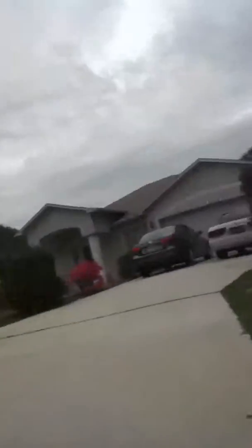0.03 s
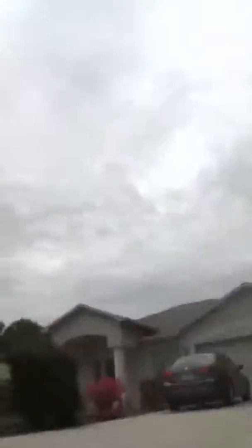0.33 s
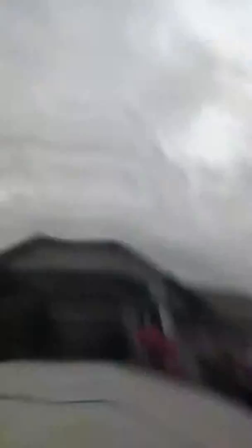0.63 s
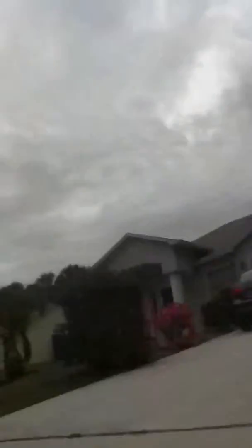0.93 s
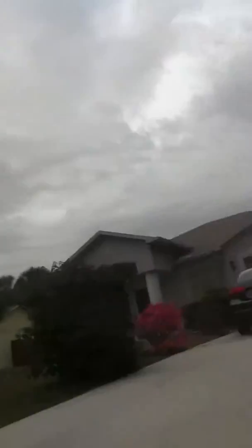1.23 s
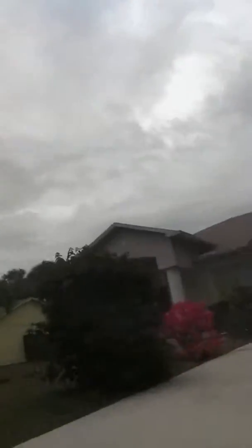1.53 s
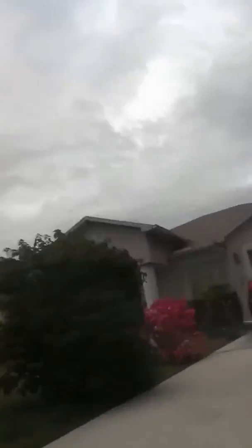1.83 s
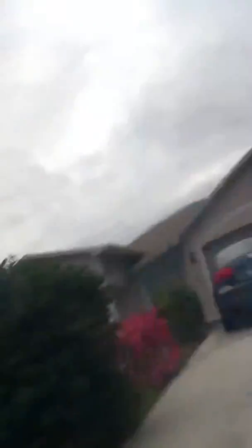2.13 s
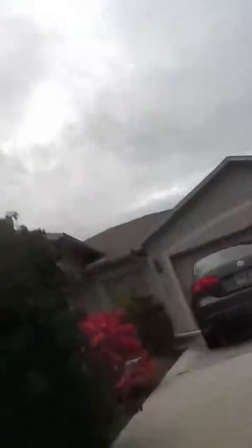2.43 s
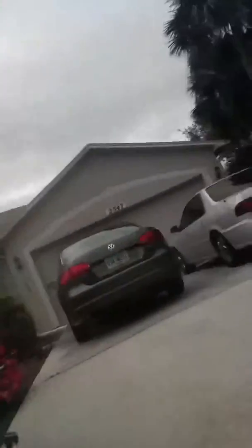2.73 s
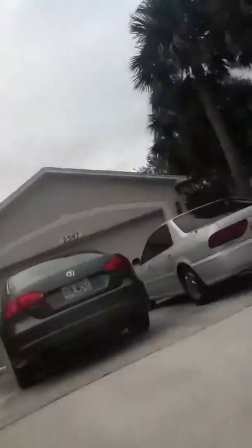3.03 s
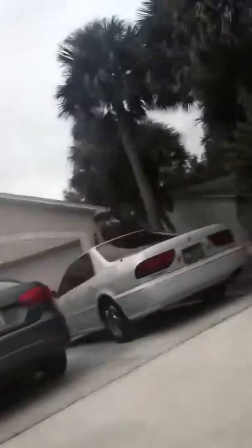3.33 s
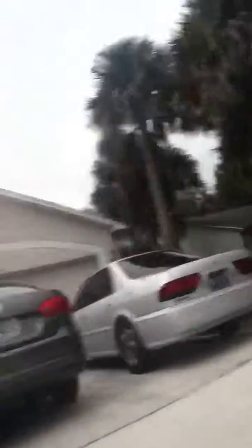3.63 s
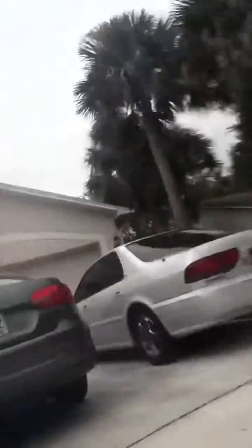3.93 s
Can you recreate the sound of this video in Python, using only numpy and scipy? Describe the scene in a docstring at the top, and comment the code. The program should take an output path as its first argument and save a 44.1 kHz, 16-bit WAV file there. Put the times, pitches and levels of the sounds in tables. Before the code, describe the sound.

A scooter rolls over concrete with a low rumble and gritty crunch, while wind buffets the close microphone. At about 0.5 seconds plastic scuffs and squeaks briefly, then quick ticks, clacks and small bumps follow. A strong thud comes at 2.2 seconds and a sharp plastic snap at 2.4. The rolling continues with sparser, lighter ticks and another bump near 3.7 seconds.

```python
"""A low rumble and a crunch of grit are heard first: a scooter rolls up a concrete driveway.
The microphone rides along in a plastic case, shaken by road vibration and buffeted by wind.
Impacts excite the damped modes of the case and its loose parts as ticks, clacks and snaps;
friction adds scuffs and squeaks, and bumps thud through the frame. A limiter holds the peaks down."""
import sys
import numpy as np
from scipy import signal
from scipy.fft import rfft, irfft
from scipy.io import wavfile
from scipy.ndimage import uniform_filter1d, minimum_filter1d

SR = 44100
rng = np.random.default_rng(int(sys.argv[2]) if len(sys.argv) > 2 else 0)


def pcm_store(signal):
    """Save signal as 16-bit PCM."""
    levels = np.round(np.clip(np.atleast_2d(signal), -1, 1) * 32767)
    wavfile.write(sys.argv[1], SR, levels.astype(np.int16).T)


N = 176400

# Levels are relative within each table; layer gains set the balance.
# Strength of the wind buffeting: time_s, level_db
WIND_LEVEL = [(.5, -43.5), (1, -26), (1.8, -34), (2.7, -23), (3.9, -28.5)]
# Spectrum of the buffeting: frequency_hz, level_db
WIND_SPECTRUM = [(30, -45), (60, 25), (85, 19), (160, -59.5)]
# Strength of the road vibration: time_s, level_db
ROAD_LEVEL = [(0, -11), (.34, -14.5), (.45, -19), (.72, -24.5), (.8, -21), (1.17, -21.5), (1.22, -16),
              (1.55, -17), (1.78, -11), (2.1, -18), (2.14, -23.5), (2.27, -27), (2.32, -18), (2.66, -16),
              (2.71, -26.5), (2.78, -17), (3.62, -16), (3.67, -10), (3.73, -17.5), (3.85, -17),
              (3.87, -29.5)]
# Spectrum of the road vibration: frequency_hz, level_db
ROAD_SPECTRUM = [(30, -37), (60, -24.5), (90, 0.5), (135, 2), (230, -1.5), (330, -6), (480, -15.5),
                 (800, -25), (1600, -60)]
# Strength of the rolling noise: time_s, crunch_db, hiss_db
ROLLING_LEVEL = [(0, -26.5, -40.5), (.33, -30.5, -41.5), (.38, -32.5, -49), (.55, -28, -41),
                 (.69, -40.5, -53.5), (1.12, -32.5, -51), (1.6, -32.5, -68), (1.68, -25, -42.5),
                 (1.86, -32, -44), (1.93, -36, -55.5), (2.2, -37, -51), (2.72, -38, -55.5),
                 (2.8, -37, -52.5), (3.66, -33.5, -52.5), (3.84, -42.5, -59.5), (3.88, -51.5, -65)]
# How unevenly the wheels run: time_s, roughness (0 to 1)
GROUND_ROUGHNESS = [(.58, .55), (.7, 1), (2.65, 1), (2.85, .75)]
# Body of rolling and rubbing noise: frequency_hz, level_db
CRUNCH_SPECTRUM = [(250, 0), (500, -1), (800, 1), (1300, -4), (1900, -6.5), (2950, -11.5), (3550, -23)]
# Treble of rolling and rubbing noise: frequency_hz, level_db
HISS_SPECTRUM = [(2000, -9.5), (3000, -0.5), (4400, 6.5), (5500, 2), (7800, 5.5), (9300, -3), (11000, -4.5),
                 (12500, -14.5), (16000, -18)]
# Resonances of the wheels: frequency_hz, width_hz
WHEEL_RESONANCES = [(1320, 165), (1800, 330)]
# Rubs against the case: start_s, length_s, body_db, treble_db
SCUFF_STROKES = [(0.49, 0.099, -24.5, -58), (0.53, 0.013, 3, -7.5), (0.976, 0.012, -21.5, -39),
                 (1.116, 0.025, -24, -45), (1.821, 0.083, -25.5, -40), (2.038, 0.029, -14.5, -20),
                 (2.216, 0.027, -5, -20), (2.773, 0.053, -26, -38.5)]
# Squeaks of rubbed plastic: start_s, length_s, pitch_hz, level_db
SQUEAK_STROKES = [(0.485, 0.05, 1150, -24), (0.58, 0.05, 2250, -31)]
# Bumps through the frame: start_s, peak_db
BUMP_HITS = [(0.759, -9), (1.041, -12), (1.128, -4.5), (1.207, -5.5), (1.243, -6.5), (1.958, -10),
             (2.219, 9), (2.777, -3.5), (3.339, -13), (3.662, -3.5)]
# Sharp ticks of the case: start_s, peak_db
TICK_HITS = [(0.3051, -9), (0.5032, -8.5), (0.6722, -17), (0.7067, -15), (0.7565, -1.5), (0.7597, -17),
             (0.823, -9.5), (0.8459, -14.5), (0.854, -10), (0.897, -16), (0.9196, -11.5), (0.942, -11.5),
             (0.981, -10), (1.0381, -9), (1.0607, -16), (1.0931, -9), (1.1169, -15), (1.1787, -19.5),
             (1.202, -12), (1.2487, -13.5), (1.3086, -13.5), (1.3252, -12.5), (1.3407, -13), (1.354, -21),
             (1.365, -14), (1.3889, -9.5), (1.4033, -15.5), (1.4276, -11.5), (1.4398, -17), (1.4712, -9),
             (1.4872, -18), (1.4953, -6), (1.5126, -11.5), (1.5549, -16), (1.576, -9), (1.6174, -4.5),
             (1.6588, -4), (1.6879, -13), (1.737, -16), (1.816, -13), (1.9114, -12), (1.9545, -2),
             (1.9607, -10), (2.0053, -15), (2.04, -9.5), (2.1641, -13.5), (2.4663, -12.5), (3.4726, -8),
             (3.572, -4.5), (3.6042, -10.5), (3.6736, -3), (3.8632, -4.5)]
# Duller clacks of loose parts: start_s, peak_db
CLACK_HITS = [(0.059, -7), (0.161, -8), (0.549, -5.5), (0.663, -10.5), (0.672, -11.5), (0.756, 0.5),
              (0.762, -6.5), (0.816, -17), (0.844, -15.5), (0.943, -5), (0.949, -15), (0.976, -9.5),
              (1.04, -10), (1.094, -12.5), (1.128, -22.5), (1.63, -9.5), (1.665, -12), (1.852, -10.5),
              (2.068, -11.5), (2.112, -15), (2.218, -1.5), (2.382, -12), (2.554, -16.5), (2.643, -9),
              (2.657, -11.5), (3.678, -11), (3.761, -15)]
# Hard plastic snaps: start_s, peak_db
SNAP_HITS = [(2.4125, 11), (2.422, -7.5), (2.586, -5.5), (3.8641, -6)]
# Low modes of the frame: frequency_hz, level_db, t60_s
FRAME_RESONANCES = [(131.5, 2.4, 0.063), (207.8, 4.9, 0.052), (335, 3.4, 0.023)]
# Modes of the ticking case: frequency_hz, level_db, t60_s
TICK_RESONANCES = [(2320, 4, 0.0018), (3700, -2, 0.0031), (4460, -2, 0.0026), (7150, 2, 0.0019),
                   (8100, 0, 0.0037), (10500, -2, 0.0016), (14400, -19, 0.0032)]
# Modes of the loose parts: frequency_hz, level_db, t60_s
CLACK_RESONANCES = [(338, -3, 0.0081), (640, -5, 0.0063), (1075, -4.5, 0.0032), (1426, -6, 0.0034),
                    (1790, -6, 0.0033), (2230, -11, 0.0028), (3840, -10.5, 0.00064)]
# Modes of the snapping plastic: frequency_hz, level_db, t60_s
SNAP_RESONANCES = [(2220, 6.4, 0.0049), (4060, 7.4, 0.00084)]

ROAD_GAIN_DB, CRUNCH_GAIN_DB, HISS_GAIN_DB, WHEEL_RING_GAIN_DB = -1, 1.5, 4.5, -13
TICK_GAIN_DB, NUDGE_GAIN_DB, CLACK_GAIN_DB, SNAP_GAIN_DB, BUMP_GAIN_DB = 0.5, -0.5, 6, -4, 5
GRIT_PER_S, GRIT_SPREAD_DB = 190, 6
FLUTTER_DB, SHAKE_EXPONENT, GRIT_SHARE = 4, .8, .82  # at full roughness
SQUEAK_RISE, SQUEAK_WOBBLE = .14, .07  # shares of the pitch
CONTACT_LAG_S, BUMP_LAG_S, CHATTER_S = 0.001, 0.00439, 0.0018
REBOUND_S, REBOUND_LOSS_DB, ROUGH_ENDS_S = .007, 10, 2.7
LIGHT_TICK_BAND_HZ = (4800, 9300)
LIMIT, RELEASE_DB_PER_S, LOW_CUT_HZ, HIGH_CUT_HZ = 0.74, 905, 38, 16000


def from_db(db):
    """Amplitude grows tenfold for every 20 dB."""
    return 10 ** (np.asarray(db) / 20)


def unit_rms(x):
    """Normalisation to a mean power of one."""
    return x / np.sqrt(np.mean(x ** 2) + 1e-20)


def envelope(x, size):
    """Short-time rms over a window of size samples."""
    return np.sqrt(uniform_filter1d(x ** 2, size=size) + 1e-9)


def evened(x, size):
    """Division by the envelope removes slow swells and keeps the fine grain."""
    return unit_rms(x / envelope(x, size))


def in_time(rows):
    """Linear interpolation gives each column of a curve at every sample."""
    time_s, *columns = np.transpose(rows)
    return [np.interp(np.arange(N) / SR, time_s, column) for column in columns]


def drift(corner_hz):
    """Low-pass filtered noise wanders smoothly with a spread near one."""
    step = 40  # samples between control points
    pole = np.exp(-2 * np.pi * corner_hz * step / SR)
    noise = rng.standard_normal(N // step + 2002)
    slow = signal.lfilter([1], [1, -2 * pole, pole * pole], noise)[2000:]
    return np.interp(np.arange(N) / step, np.arange(len(slow)), unit_rms(slow))


def coloured(x, spectrum, edge_db_per_octave=24):
    """A minimum-phase filter imposes the spectrum and rolls off above its last point; rms 1."""
    hz, db = np.transpose(spectrum)
    grid_hz = np.maximum(np.arange(N // 2 + 1) * SR / N, 1)
    shape_db = np.interp(np.log(grid_hz), np.log(hz), db)
    shape_db -= edge_db_per_octave * np.maximum(np.log2(grid_hz / hz[-1]), 0)
    cepstrum = irfft(np.log(from_db(shape_db)), N)
    cepstrum[1:N // 2] *= 2  # folding makes the filter causal
    cepstrum[N // 2 + 1:] = 0
    return unit_rms(irfft(rfft(x) * np.exp(rfft(cepstrum)), N))


def resonant(x, hz, width_hz):
    """A driven resonator responds most near its natural frequency; rms 1."""
    radius = np.exp(-np.pi * width_hz / SR)
    feedback = [1, -2 * radius * np.cos(2 * np.pi * hz / SR), radius * radius]
    return unit_rms(signal.lfilter([1, 0, -1], feedback, x))


def impacts(hits, modes, vary_db, detune, chatter, lag_s=CONTACT_LAG_S, size=4096):
    """Modal superposition: a chattering impulse drives damped sinusoids that vary from hit to hit."""
    out, t = np.zeros(N + 2 * size), np.arange(size) / SR
    hz, db, t60_s = np.transpose(modes)[:, :, None]
    signs = (-1) ** np.arange(len(modes))[:, None]
    for start_s, peak_db in hits:
        strength, shift = rng.standard_normal((2, len(modes), 1))
        decay = from_db(db + vary_db * strength - 60 * t / t60_s)
        ring = np.sum(signs * decay * np.sin(2 * np.pi * hz * (1 + detune * shift) * t), axis=0)
        force = chatter * rng.standard_normal(size) * np.exp(-t / CHATTER_S)
        force[0] += 1
        hit = signal.fftconvolve(ring, force)[:size]
        start = int(np.clip((start_s + lag_s) * SR, 0, N))
        out[start:start + size] += rng.choice([-1, 1]) * from_db(peak_db) * hit / np.abs(hit).max()
    return out[:N]


def wind():
    """Turbulent pressure on the microphone is heard as deep buffeting."""
    level_db, = in_time(WIND_LEVEL)
    pressure = coloured(rng.standard_normal(N), WIND_SPECTRUM)
    return from_db(level_db) * evened(pressure, size=4400)


def road_rumble(shake):
    """Structure-borne vibration from the road is heard as a low rumble."""
    level_db, = in_time(ROAD_LEVEL)
    return from_db(ROAD_GAIN_DB + level_db) * shake


def wheels(shake):
    """Rolling contact: rush and random grit impulses surge with the load and ring the wheels."""
    crunch_db, hiss_db = in_time(ROLLING_LEVEL)
    roughness, = in_time(GROUND_ROUGHNESS)
    grains = from_db(GRIT_SPREAD_DB * np.minimum(rng.exponential(1, N), 2)) * rng.choice([-1, 1], N)
    grit = grains * (rng.random(N) < GRIT_PER_S / SR)
    jolts = envelope(shake, size=260) ** (SHAKE_EXPONENT * roughness)
    load = jolts * from_db(FLUTTER_DB * roughness * drift(70))
    grit_share = GRIT_SHARE * roughness

    def rolling(spectrum):
        """Uncorrelated rush and grit add in power and pass through one filter."""
        rush = np.sqrt(1 - grit_share) * rng.standard_normal(N)
        crackle = np.sqrt(grit_share) * unit_rms(grit * rng.random(N))
        return evened(coloured(load * (rush + crackle), spectrum), size=3000)

    crunch = rolling(CRUNCH_SPECTRUM)
    ring = sum(resonant(crunch, hz, width) * from_db(2 * drift(4.3)) for hz, width in WHEEL_RESONANCES)
    body = from_db(CRUNCH_GAIN_DB + crunch_db) * (crunch + from_db(WHEEL_RING_GAIN_DB) * ring)
    return body + from_db(HISS_GAIN_DB + hiss_db) * rolling(HISS_SPECTRUM)


def scuffs():
    """Sliding friction on the case makes bursts of noise that catch quickly and fade."""
    out, t = np.zeros(N), np.arange(N) / SR
    friction = rng.standard_normal(N) * from_db(drift(600))
    body, treble = coloured(friction, CRUNCH_SPECTRUM), coloured(friction, HISS_SPECTRUM)
    for start_s, length_s, body_db, treble_db in SCUFF_STROKES:
        progress = np.clip((t - start_s) / length_s, 0, 1)
        stroke = np.sin(np.pi * np.sqrt(progress))
        out += stroke * (from_db(body_db) * body + from_db(treble_db) * treble)
    return out


def squeaks():
    """Stick-slip oscillation of rubbed plastic gives short, rough, rising whines."""
    out, t = np.zeros(N), np.arange(N) / SR
    for start_s, length_s, pitch_hz, level_db in SQUEAK_STROKES:
        progress = np.clip((t - start_s) / length_s, 0, 1)
        slip_hz = pitch_hz * (1 + SQUEAK_RISE * progress + SQUEAK_WOBBLE * drift(500))
        out += from_db(level_db) * np.sin(np.pi * progress) * np.sin(2 * np.pi * np.cumsum(slip_hz) / SR)
    return out


def with_rebounds(hits, count=2):
    """Inelastic collision: on the rough stretch, weaker bounces follow each hit at uneven gaps."""
    start_s, peak_db = np.transpose([hit for hit in hits if hit[0] < ROUGH_ENDS_S])[:, :, None]
    gap_scatter, loss_scatter = rng.uniform(-1.4, 1, (len(start_s), 2, count)).transpose(1, 0, 2)
    bounce_s = start_s + np.cumsum(REBOUND_S * (1 + .5 * gap_scatter), axis=1)
    loss_db = REBOUND_LOSS_DB * (np.sqrt(1 + 2 * np.arange(count)) + .5 * loss_scatter)
    bounce_db = np.minimum(peak_db, np.median(peak_db)) - loss_db
    return np.vstack([hits, np.column_stack([bounce_s.ravel(), bounce_db.ravel()])])


def lightened(ticks):
    """Band limiting: after the rough stretch, lighter contacts lose their body and their top."""
    light = signal.sosfilt(signal.butter(2, LIGHT_TICK_BAND_HZ, "band", fs=SR, output="sos"), ticks)
    return np.where(np.arange(N) / SR < ROUGH_ENDS_S, ticks, light)


def case_rattle():
    """Heavily damped plastic modes tick, clack and snap; each main tick also nudges the frame."""
    ticks = impacts(with_rebounds(TICK_HITS), TICK_RESONANCES,
                    vary_db=1.8, detune=.03, chatter=.1, size=512)
    clacks = impacts(with_rebounds(CLACK_HITS), CLACK_RESONANCES,
                     vary_db=1.8, detune=.1, chatter=.1, size=1024)
    snaps = impacts(SNAP_HITS, SNAP_RESONANCES, vary_db=2, detune=.05, chatter=.08, size=512)
    nudges = impacts(TICK_HITS, FRAME_RESONANCES, vary_db=2, detune=.15, chatter=.05)
    return (from_db(TICK_GAIN_DB) * lightened(ticks) + from_db(NUDGE_GAIN_DB) * nudges
            + from_db(CLACK_GAIN_DB) * clacks + from_db(SNAP_GAIN_DB) * snaps)


def bumps():
    """Impulse response: uneven concrete jolts the frame, whose low modes decay as a short thud."""
    thuds = impacts(BUMP_HITS, FRAME_RESONANCES,
                    vary_db=1.5, detune=0.0077, chatter=0.158, lag_s=BUMP_LAG_S)
    return from_db(BUMP_GAIN_DB) * thuds


def scene():
    """Superposition close up in the open air; one vibration drives the rumble and loads the wheels."""
    shake = evened(coloured(rng.standard_normal(N), ROAD_SPECTRUM), size=3000)
    mix = wind() + road_rumble(shake) + wheels(shake) + scuffs() + squeaks() + case_rattle() + bumps()
    return mix[None]


def record(dry):
    """Peak limiting with a fast release; filters then cut the deepest bass and the top."""
    over_db = 20 * np.log10(np.maximum(np.abs(dry[0]) / LIMIT, 1))
    release_db = RELEASE_DB_PER_S * np.arange(N) / SR
    gain = from_db(release_db - np.maximum.accumulate(over_db + release_db))
    gain = uniform_filter1d(minimum_filter1d(gain, size=31), size=31)  # eases down ahead of each peak
    low_cut = signal.butter(2, LOW_CUT_HZ, "high", fs=SR, output="sos")
    high_cut = signal.ellip(10, .1, 80, HIGH_CUT_HZ, fs=SR, output="sos")
    return signal.sosfilt(high_cut, signal.sosfilt(low_cut, dry * gain))


dry = scene()
out = record(dry)
pcm_store(out)
```